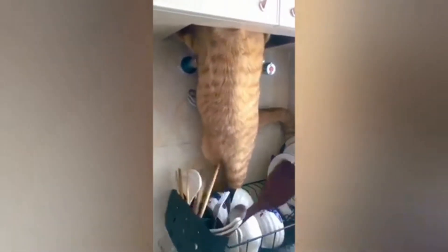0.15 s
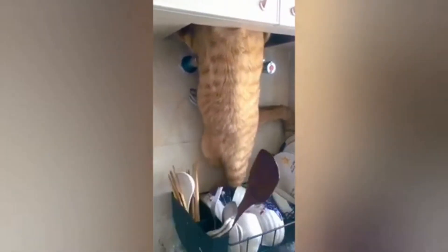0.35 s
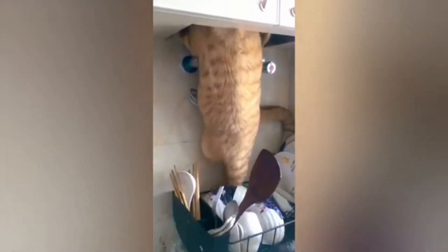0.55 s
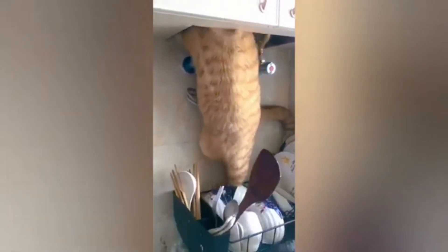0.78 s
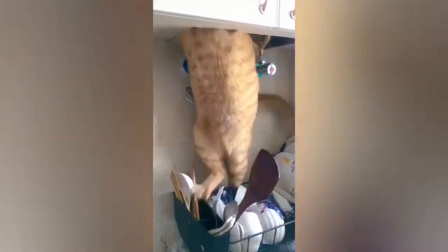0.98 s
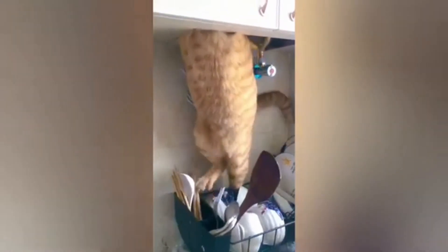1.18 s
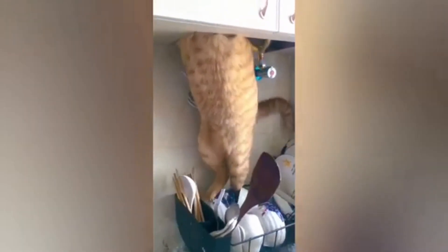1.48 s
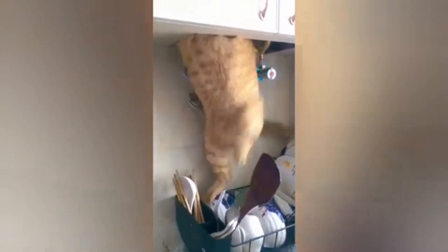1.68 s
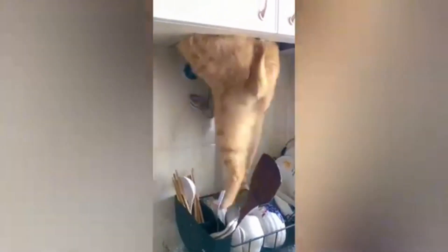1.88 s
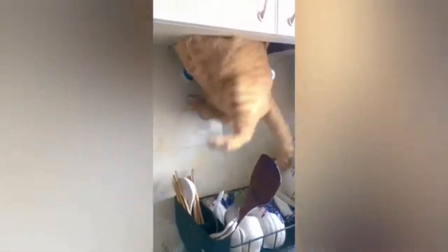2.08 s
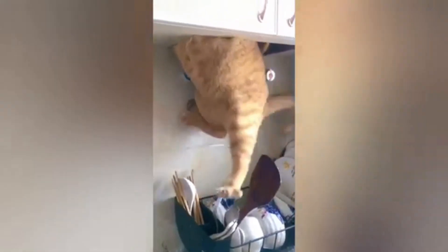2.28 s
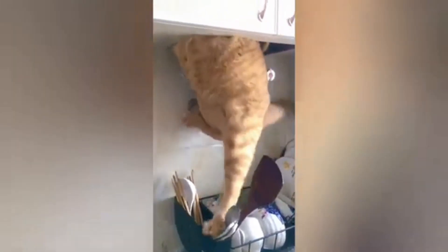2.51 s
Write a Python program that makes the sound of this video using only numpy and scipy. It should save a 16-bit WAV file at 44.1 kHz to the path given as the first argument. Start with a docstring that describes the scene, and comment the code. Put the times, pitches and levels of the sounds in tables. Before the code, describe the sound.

Kitchen utensils and dishes rattle, knock and clink in a rack as a cat scrambles over them

```python
"""A cat scrambles over a dish rack on the counter of a small kitchen, close to the microphone.
First utensils knock, drum and rattle in their plastic holder, with cutlery clinking, sliding and squeaking.
After a short lull come more knocks, hard clacks of dishes and heavy thuds of paws on the hollow counter.
Then the rack is shoved twice and scrapes; paws thud and brush, and the counter booms on to the end.
Modes ring after blows, coloured noise grains rub, and a room response answers from wall and counter."""
import sys
import numpy as np
from scipy import signal
from scipy.fft import rfft, irfft
from scipy.io import wavfile

SR = 44100
rng = np.random.default_rng(int(sys.argv[2]) if len(sys.argv) > 2 else 0)


def file_out(sig):
    """Save sig as 16-bit WAV at sys.argv[1]."""
    # one column per channel
    cols = np.atleast_2d(sig).T
    # limit, then scale
    lim = np.clip(cols, -1, 1)
    pcm = np.round(lim * 32767).astype(np.int16)
    wavfile.write(sys.argv[1], SR, pcm)


N = 116865

# Spectrum of the low room hum. Each row: frequency in Hz, level in dB.
HUM_TONE = [(15, -52.5), (25, -8.5), (87, -0.5), (231, -21), (382, -14), (448, -21.5), (940, -19.5),
            (2190, -39), (8470, -33), (12600, -35), (14000, -77.5)]
# Reverberation of the kitchen. Each row: frequency in Hz, time to fall 60 dB in seconds.
ROOM_T60 = [(150, 0.17), (700, 0.48), (1500, 0.36), (4500, 0.28), (9000, 0.27), (13000, .25)]
# The counter booming under the moving cat. Each row: time in seconds, level in dB.
BOOM_LEVEL = [(0, -61), (.25, -48), (.33, -42), (.6, -47), (1.15, -51), (1.24, -31.5), (1.3, -31.5),
              (1.4, -35.5), (1.6, -46.5), (2.1, -52), (2.17, -36), (2.3, -31.5), (2.45, -37.5),
              (2.65, -46.5)]
# Spectrum of that boom. Each row: frequency in Hz, level in dB.
BOOM_TONE = [(25, -48), (55, -20.5), (70, -4.5), (80, -1), (98, -6), (118, -10.5), (135, -11.5),
             (165, -3.5), (215, -12), (330, -25.5), (1000, -66.5)]
# Paws and rack thudding on the counter. Each row: start in seconds, level in dB before THUD_LIFT_DB,
# centre of the push in Hz.
THUDS = [(0, -31, 155), (.226, -29, 226), (0.315, -16.5, 155), (.456, -20, 170), (0.559, -26.5, 164),
         (0.808, -41, 130), (1.086, -34.5, 350), (1.17, -31.5, 260), (1.236, -15, 165), (1.262, -24.5, 180),
         (1.294, -19, 110), (1.374, -29, 132), (1.503, -24.5, 435), (1.652, -55, 106), (1.825, -27, 200),
         (1.912, -24, 139), (2.064, -32, 286), (2.143, -21, 101), (2.185, -12.5, 203), (2.24, -14, 238),
         (2.283, -11.5, 265), (2.347, -18, 270), (2.38, -22, 245), (2.431, -24, 217), (2.549, -44, 150)]
# Counter modes. Each row: frequency in Hz before COUNTER_PITCH, level in dB, time to fall 60 dB in seconds.
COUNTER_MODES = [(78.9, 1, 0.98), (111.5, -15, 0.1), (151.85, 4, 0.65), (175.5, 2.5, 0.3),
                 (202.4, -12, 0.38), (244, -0.5, 0.21), (279.1, -2, 0.54), (300, -33, 0.12),
                 (409.6, -1.5, 0.37), (432.7, -2.5, 0.33)]
# Paws brushing over the counter. Each row: time in seconds, level in dB.
BRUSH_LEVEL = [(1.2, -46), (1.25, -42.5), (1.36, -49.5), (1.45, -50.5), (2.15, -47), (2.22, -30.5),
               (2.3, -38.5), (2.38, -44), (2.46, -51), (2.6, -69.5)]
# Spectrum of the brushing. Each row: frequency in Hz, level in dB.
BRUSH_TONE = [(100, -11), (400, -8), (700, -1.5), (1100, -5.5), (2000, -18), (5000, -24.5), (13000, -30)]
# First shove of the rack. Each row: time in seconds, level in dB.
FIRST_SHOVE_LEVEL = [(1.785, -48), (1.812, -25.5), (1.83, -22.5), (1.847, -14), (1.868, -22.5),
                     (1.892, -24.5), (1.916, -18.5), (1.945, -29), (2.0, -46)]
# Spectrum of the first shove. Each row: frequency in Hz, level in dB.
FIRST_SHOVE_TONE = [(100, -50), (400, -3.5), (500, -12), (600, -1), (850, 4), (1200, -2.5), (1650, 5.5),
                    (2300, -1), (2800, 3.5), (3900, -7.5), (4500, 0), (5500, -10.5), (6900, -15),
                    (8100, -9.5), (9800, -23), (13000, -25)]
# Second shove of the rack. Each row: time in seconds, level in dB.
SECOND_SHOVE_LEVEL = [(2.028, -59), (2.04, -38), (2.064, -26), (2.078, -18.5), (2.11, -27), (2.148, -22),
                      (2.17, -20), (2.215, -28), (2.235, -40), (2.3, -44)]
# Spectrum of the second shove. Each row: frequency in Hz, level in dB.
SECOND_SHOVE_TONE = [(100, -2.5), (500, -21), (760, 10.5), (1000, -16.5), (1300, -4.5), (1570, 8.5),
                     (1950, -12.5), (2250, 10), (2600, -3), (3800, 0), (4650, 3.5), (5500, -2), (7200, -16),
                     (8400, -1), (10000, -17), (13000, -8)]
# Metal sliding on metal. Each row: time in seconds, level in dB.
SLIDE_LEVEL = [(.24, -47), (.285, -26.5), (.34, -32), (.41, -32), (.47, -36.5), (.51, -36), (.59, -28),
               (.64, -39), (.7, -48)]
# Spectrum of the sliding. Each row: frequency in Hz, level in dB.
SLIDE_TONE = [(2000, -31), (5000, -9.5), (7200, 0.5), (8000, 1), (9200, 1.5), (10300, -7), (12000, 1.5),
              (13500, -26.5)]
# Squeaks of a sticking edge. Each row: start in seconds, length in seconds, pitch in Hz, level in dB.
SQUEAKS = [(.355, .06, 5370, -32), (.52, .05, 8900, -32), (.577, .02, 7850, -24), (.572, .035, 12200, -31),
           (1.045, .045, 760, -56), (1.05, .04, 4950, -58), (1.05, .04, 8200, -59),
           (1.803, .028, 4380, -24), (1.815, .045, 4600, -26), (2.038, .035, 770, -28),
           (2.073, .055, 800, -24), (2.078, .04, 720, -26), (2.077, .027, 2240, -21),
           (2.093, .018, 8600, -28), (2.095, .014, 4420, -22), (2.158, .022, 4750, -21)]
# Strokes on a fork tine that sings on. Each row: start in seconds, level in dB.
TINE_STROKES = [(0, -53), (.22, -47), (.283, -40), (.366, -39), (.5, -44)]
# Cutlery clinks. Each row: start in seconds, level in dB, pitch in Hz, overtone ratio,
# overtone level in dB, time to fall 60 dB in seconds.
CLINKS = [(0.282, -11.5, 9160, 1.28, -3.5, 0.018), (.403, -7.5, 2083, 4.5, -9.5, 0.034),
          (.545, -9, 2120, 1.19, -4.5, 0.042), (1.170, -17.5, 2260, 1.6, -18, .08),
          (1.208, -19.5, 2432, 1.04, 4, 0.048), (1.403, -15, 4790, .47, 2.5, 0.022),
          (2.075, -8, 4550, 1.6, -9, 0.027), (2.091, -14, 4700, 2.3, -8, 0.0085),
          (2.181, -19, 4620, 0.56, -3, 0.021), (2.247, -9, 2653, 1.86, -8.5, 0.021),
          (2.247, -29.5, 2540, 1.09, -7, 0.2), (1.669, -21.5, 4880, 0.48, -6, 0.036)]
# Dishes clacking on the rack. Each row: start in seconds, level in dB,
# treble tilt in dB per octave, chatter decay in seconds.
CLACKS = [(.222, -14.5, -7, 0.012), (.501, -5, 1, 0.017), (1.154, -24.5, -0.5, 0.0051),
          (1.168, -18.5, 0, 0.0096), (1.182, -11, 12.5, 0.012), (1.212, -17, 0.5, 0.027),
          (1.5, -7, 1.5, 0.0037), (1.824, -16, -12, 0.0025), (1.835, -11.5, -5, 0.0018),
          (2.073, -10.5, -1, .005), (2.248, -17.5, 6, 0.0045), (2.35, -30.5, -0.5, 0.011)]
# Spectrum of hard contacts. Each row: frequency in Hz, level in dB.
CLACK_TONE = [(100, -10), (300, -23.5), (450, -14), (560, -19.5), (800, -4.5), (1300, -3.5), (1900, 3.5),
              (2600, 7), (4500, 1), (7200, 2.5), (10000, -3), (13500, -9.5)]
# Loose utensils jostling. Each row: time in seconds, level in dB.
RATTLE_LEVEL = [(0, -31.5), (.03, -45.5), (.05, -32), (.1, -49), (.21, -35), (.26, -27.5), (.33, -23),
                (.42, -22.5), (.48, -24), (.52, -21), (.59, -23.5), (.66, -29), (.72, -49), (.9, -55.5),
                (1.14, -58), (1.18, -24), (1.23, -32.5), (1.28, -40.5), (1.37, -40.5), (1.41, -26),
                (1.47, -32), (1.54, -26), (1.59, -43.5), (1.68, -26.5), (1.73, -60), (2.2, -34),
                (2.35, -50), (2.6, -57.5)]
# Spectrum of the jostling. Each row: frequency in Hz, level in dB.
RATTLE_TONE = [(100, -12), (300, -9.5), (530, -17.5), (800, -4.5), (1200, 4.5), (1700, -1), (2300, -1),
               (3200, -8), (4700, -7), (6300, -13.5), (9000, -19.5), (13000, -23.5)]
# Handles drumming on the holder between the knocks. Each row: time in seconds, level in dB.
DRUM_LEVEL = [(.22, -55), (.24, -20), (.3, -27), (.34, -30), (.42, -30), (.48, -46), (.52, -21),
              (.57, -28.5), (.63, -27), (.67, -40), (0.718, -44)]
# Utensils knocking on the holder. Each row: start in seconds, level in dB, pitch factor,
# click relative to the knock in dB.
KNOCKS = [(.001, -35.5, 1.05, 8), (0.033, -27.5, 1, -4.5), (0.063, -29, 1.05, -8), (0.126, -25, 1, -10),
          (0.177, -16.5, .95, -6.5), (0.235, -8.5, .97, -12), (.244, -14.5, .95, -8),
          (.268, -13, .97, -6.5), (0.275, -20, .97, 3), (0.295, -21, 1, 3), (0.314, -9.5, .97, -14),
          (0.332, -8, 1.05, -6), (.343, -15.5, 1.08, -7), (.366, -9.5, 1, -9), (0.401, -22, 1.05, -11),
          (.443, -16, 1, -26), (0.497, -11, 1, -2), (0.512, -10.5, 1.05, -14), (.553, -15, 1, -12),
          (0.561, -9.5, 1.04, -25), (0.571, -16, 1, 1), (0.592, -12.5, 1, 0), (0.614, -27.5, 1, 5.5),
          (0.628, -16.5, 1, -10), (0.634, -20.5, 1, -0.5), (0.645, -24, 1, 3.5), (.728, -34, 1.1, -10),
          (1.169, -20.5, 1, -3), (1.205, -17.5, 1.1, -6), (1.327, -22.5, .83, -14), (1.384, -26, 1.1, 4),
          (1.423, -28.5, 1.1, 10), (1.456, -24.5, 1, -3), (1.488, -17.5, 1, -4), (1.503, -12.5, 1, 2.5),
          (1.618, -19.5, 1.2, -4.5), (1.653, -9, 1.09, -30), (1.660, -14.5, 1.11, -29),
          (1.665, -18.5, 1.08, -2.5), (1.672, -21, 1.08, -26), (1.677, -24, 1.06, -7),
          (1.683, -20, 1.08, 2), (2.036, -24.5, 0.59, 2), (2.203, -20.5, 0.91, 2.5),
          (2.212, -19.5, 0.96, -4)]
# Modes of the plastic holder. Each row: frequency in Hz before the pitch factor, level in dB,
# time to fall 60 dB in seconds.
HOLDER_MODES = [(850, -18, .04), (1050, -6, .05), (1170, 0, .05), (1290, -1, .035), (1440, -2, .04),
                (1720, -11, .025), (2140, -9, .025), (2600, -17, .02)]

HUM_DB, CEILING, EDGE_HZ = -50, .88, 13400
ROOM_DB, NEAR_DB, NEAR_DECAY_S, WIDTH_DB = -7, -3.5, 0.0072, -10
BOOM_PER_S, RATTLE_PER_S, SLIPS_PER_S, DRUM_PER_S = 730, 900, 2500, 500
GRAIN_DB, SMEAR_S = -5.5, 0.00097
COUNTER_PITCH, THUD_LIFT_DB = 0.97, 2
PUSH_OCTAVES, PUSH_SPAN, PUSH_DECAY_S, PUSH_DB = 0.58, 1.126, 0.042, -4.5
SQUEAK_WIDTH_HZ, SQUEAK_EDGE_S = 90, .003
TINE_HZ, TINE_T60_S, TINE_STOP_S, TINE_DAMP_S = 12920, .8, 0.76, .015
KNOCK_CHATTER_S, CLICK_CHATTER_S, CHATTER, BLOW_S = 0.0029, 0.0035, 0.37, 0.0015
KNOCK_SPREAD_DB, SOFT_TILT, DRUM_PITCH = 2, .2, 1.07


def amp(db):
    """Turns dB into an amplitude factor."""
    return 10 ** (np.asarray(db) / 20)


def evened(x):
    """Scales a sound to an RMS of one."""
    return x / np.sqrt(np.mean(x ** 2) + 1e-20)


def blow(x):
    """Scales a sound to the energy of one short blow."""
    return x * np.sqrt(BLOW_S * SR / (np.sum(x ** 2) + 1e-20))


def read(points, hz):
    """Reads a table between its rows, along a logarithmic frequency axis."""
    f, value = np.transpose(points)
    return np.interp(np.log(hz + 1), np.log(f + 1), value)


def clock(size):
    """Time of each sample in seconds."""
    return np.arange(size) / SR


def fader(level):
    """Amplitude following a level table, practically silent outside it."""
    s, db = np.transpose(level)
    return amp(np.interp(clock(N), s, db, left=-100, right=-100))


def add(mix, s, sound):
    """Lays a sound into the mix at s seconds."""
    part = mix[max(0, round(s * SR)):][:len(sound)]
    part += sound[:len(part)]


def highpass(x, order, hz):
    """Butterworth filter that removes what lies below hz."""
    return signal.sosfilt(signal.butter(order, hz, "high", fs=SR, output="sos"), x)


def colour(x, tone, tilt_db=0, size=4096):
    """Causal filter with the given spectrum, tilted per octave above 1 kHz."""
    hz = np.fft.rfftfreq(size, 1 / SR)
    tilt = tilt_db * np.log2(np.maximum(hz, 1000) / 1000)
    cepstrum = irfft(np.log(amp(read(tone, hz) + tilt)))
    # folding the cepstrum forward in time gives minimum phase
    cepstrum[1:size // 2] *= 2
    cepstrum[size // 2 + 1:] = 0
    return signal.fftconvolve(x, irfft(np.exp(rfft(cepstrum))))[:len(x)]


def random_taps(shape, per_s):
    """Sparse unit pulses of random sign at random times."""
    return rng.choice([-1., 1.], shape) * (rng.random(shape) < per_s / SR)


def contact(decay_s, size=4096):
    """A first touch followed by dying chatter."""
    x = CHATTER * rng.standard_normal(size) * np.exp(-clock(size) / decay_s)
    x[0] = 1
    return x


def ring(modes, pitch, size):
    """Sum of exponentially dying modes with alternating signs."""
    t, out = clock(size), np.zeros(size)
    for k, (hz, db, t60) in enumerate(modes):
        out += (-1) ** k * amp(db - 60 * t / t60) * np.sin(2 * np.pi * hz * pitch * t)
    return out


def rubbing(level, tone, per_s):
    """Many small, gritty contacts excite a body, following a level curve."""
    sizes = amp(GRAIN_DB * np.minimum(rng.exponential(1, N), 3))
    touches = random_taps(N, per_s) * sizes
    # every touch smears into a short burst of noise
    grit = np.sqrt(signal.lfilter([1], [1, -np.exp(-1 / (SMEAR_S * SR))], touches ** 2))
    grains = evened(grit * rng.standard_normal(N))
    return colour(grains * fader(level), tone) / np.std(colour(grains, tone))


def room_hum():
    """Steady noise, mostly bass, lies under everything."""
    return amp(HUM_DB) * evened(colour(rng.standard_normal(N), HUM_TONE))


def kitchen(x):
    """Quick reflections from wall and counter, then the tail of the room."""
    t = clock(SR)
    taps = random_taps((2, SR), 3000) * (t > .0015)
    near = taps[0] * np.exp(-t / NEAR_DECAY_S)
    # the tail swells in over 4.2 ms, then each band dies at its own rate
    hz, at, bands = signal.stft(taps[1] * np.minimum(t / 0.0042, 1), SR, nperseg=256)
    decay = amp(-60 * at / read(ROOM_T60, hz)[:, None])
    tail = signal.istft(bands * decay, SR, nperseg=256)[1][:SR]
    near = amp(NEAR_DB) * near / np.linalg.norm(near)
    tail = amp(ROOM_DB) * tail / np.linalg.norm(tail)
    return signal.fftconvolve(x, near + tail)[:N]


def counter_boom():
    """Dense low grains make the counter boom under the moving cat."""
    return rubbing(BOOM_LEVEL, BOOM_TONE, BOOM_PER_S)


def thuds():
    """A soft push wakes the counter modes that lie near its centre."""
    out, t = np.zeros(N), clock(SR)
    for s, db, hz in THUDS:
        modes = [(f, d - 6 * (np.log2(f / hz) / PUSH_OCTAVES) ** 2, t60) for f, d, t60 in COUNTER_MODES]
        body = blow(ring(modes, COUNTER_PITCH, size=SR))
        band = signal.butter(2, [hz / PUSH_SPAN, hz * PUSH_SPAN], "band", fs=SR, output="sos")
        push = signal.sosfilt(band, rng.standard_normal(SR) * np.exp(-t / PUSH_DECAY_S))
        add(out, s, amp(db + THUD_LIFT_DB) * (body + amp(PUSH_DB) * blow(push)))
    return out


def paw_brush():
    """Paws brush over the counter in many fine slips, dull in colour."""
    return rubbing(BRUSH_LEVEL, BRUSH_TONE, SLIPS_PER_S)


def shoves():
    """The rack scrapes in two shoves, each a stream of slips with its own resonances."""
    first = rubbing(FIRST_SHOVE_LEVEL, FIRST_SHOVE_TONE, SLIPS_PER_S)
    return first + rubbing(SECOND_SHOVE_LEVEL, SECOND_SHOVE_TONE, SLIPS_PER_S)


def metal_slide():
    """Metal slides on metal in fine, bright slips."""
    return rubbing(SLIDE_LEVEL, SLIDE_TONE, SLIPS_PER_S)


def squeaks():
    """An edge sticks and slips at one unsteady pitch: a narrow band of noise."""
    out, t = np.zeros(N), clock(8192)
    pole = np.exp(-np.pi * SQUEAK_WIDTH_HZ / SR)
    for s, length, hz, db in SQUEAKS:
        noise = rng.standard_normal(len(t)) + 1j * rng.standard_normal(len(t))
        wander = signal.lfilter([1], [1, -pole], noise)
        steadier = wander / np.sqrt(abs(wander))  # halves the level swings in dB
        tone = evened((steadier * np.exp(2j * np.pi * hz * t)).real)
        fade = np.clip(np.minimum(t, length - t) / SQUEAK_EDGE_S, 0, 1)
        add(out, s, amp(db) * tone * fade)
    return out


def fork_tine():
    """One tine sings on after each stroke until the fork comes to rest against a dish."""
    out = np.zeros(N)
    for s, db in TINE_STROKES:
        add(out, s, ring([(TINE_HZ, db, TINE_T60_S)], 1 + .0004 * rng.standard_normal(), size=SR))
    return out * np.exp(-np.maximum(clock(N) - TINE_STOP_S, 0) / TINE_DAMP_S)


def clinks():
    """Cutlery struck on crockery rings in two damped partials."""
    out = np.zeros(N)
    for s, db, hz, ratio, over_db, t60 in CLINKS:
        partials = [(hz, 0, t60), (hz * ratio, over_db, t60)]
        add(out, s, amp(db) * blow(ring(partials, 1, size=8192)))
    return out


def clacks():
    """Dishes hit the rack: wide, short cracks."""
    out = np.zeros(N)
    for s, db, tilt_db, decay_s in CLACKS:
        add(out, s, amp(db) * blow(colour(contact(decay_s), CLACK_TONE, tilt_db)))
    return out


def rattle():
    """Loose utensils jostle in many small contacts."""
    return rubbing(RATTLE_LEVEL, RATTLE_TONE, RATTLE_PER_S)


def drumming():
    """Dense, soft taps keep the holder ringing."""
    taps = evened(random_taps(N, DRUM_PER_S)) * fader(DRUM_LEVEL)
    body = ring(HOLDER_MODES, DRUM_PITCH, size=4096)
    return signal.fftconvolve(taps, body / np.linalg.norm(body))[:N]


def knocks():
    """Each knock clicks and rings the plastic holder, at a different spot every time."""
    out = np.zeros(N)
    centre_hz = HOLDER_MODES[3][0]
    for s, db, pitch, click_db in KNOCKS:
        spot = KNOCK_SPREAD_DB * rng.standard_normal(len(HOLDER_MODES))
        modes = []
        for (hz, mode_db, t60), spot_db in zip(HOLDER_MODES, spot):
            # a weak click means a soft blow, which excites the outer modes less
            tilt_db = SOFT_TILT * click_db * abs(np.log2(hz / centre_hz))
            modes.append((hz, mode_db + spot_db + tilt_db, t60))
        body = signal.fftconvolve(contact(KNOCK_CHATTER_S), ring(modes, pitch, size=4096))
        click = colour(contact(CLICK_CHATTER_S), CLACK_TONE, tilt_db=-6.0)
        add(out, s, amp(db) * blow(body))
        add(out, s, amp(db + click_db) * blow(click))
    return out


def scene():
    """All is central; only the treble of the rack's and paws' reflections spreads sideways."""
    counter = thuds() + counter_boom()
    scrapes = paw_brush() + shoves() + metal_slide() + squeaks()
    strikes = fork_tine() + clinks() + clacks() + rattle() + drumming() + knocks()
    rack = scrapes + strikes
    # the reflections change as things shift in the rack: two responses blend, one turn a second
    turn = 2 * np.pi * clock(N)
    wet = kitchen(rack * np.cos(turn)) + kitchen(rack * np.sin(turn))
    mid = room_hum() + counter + wet + rack
    side = amp(WIDTH_DB) * highpass(kitchen(rack), 12, 4200)
    return np.array([mid + side, mid - side])


def record(dry):
    """The microphone sheds deep bass, the loudest peaks are rounded, then the treble is cut off."""
    x = highpass(dry, 3, 55)
    x = x / (1 + (x / CEILING) ** 6) ** (1 / 6)
    lowpass = signal.firwin(201, EDGE_HZ, window=("kaiser", 10), fs=SR)
    return signal.oaconvolve(x, lowpass[None], "same")


dry = scene()
out = record(dry)
file_out(out)
```